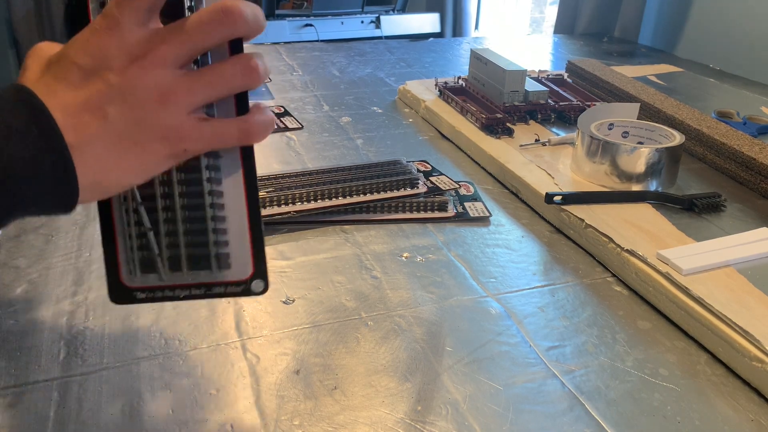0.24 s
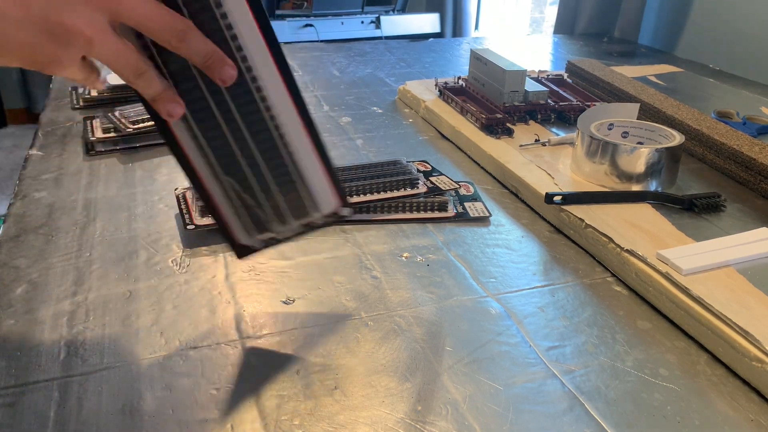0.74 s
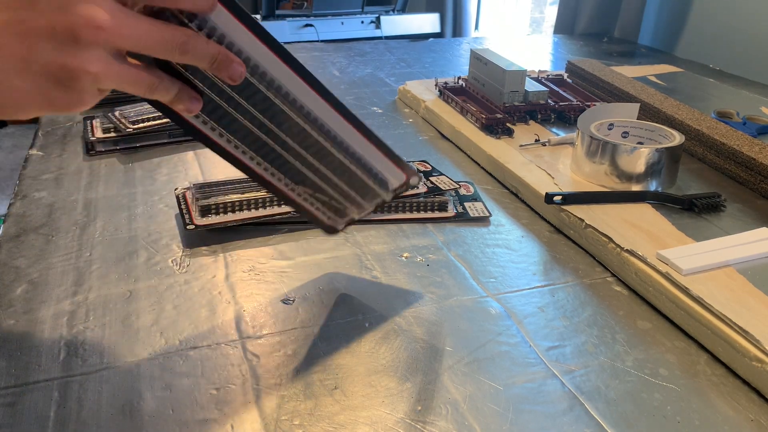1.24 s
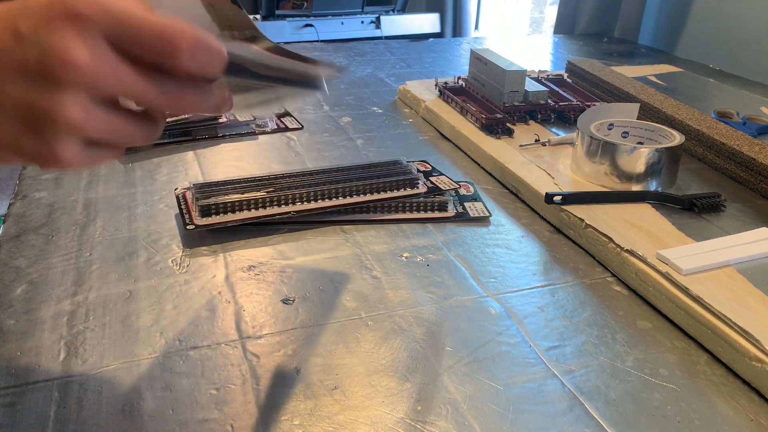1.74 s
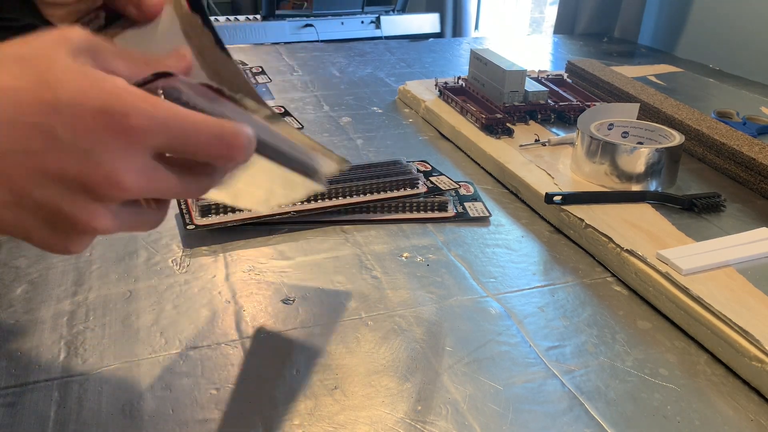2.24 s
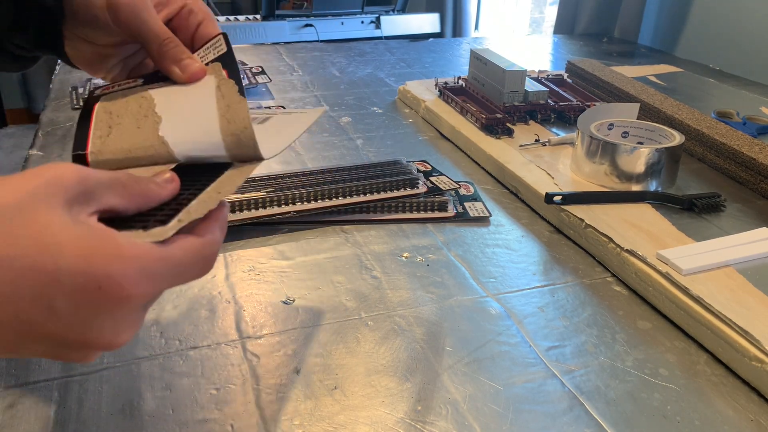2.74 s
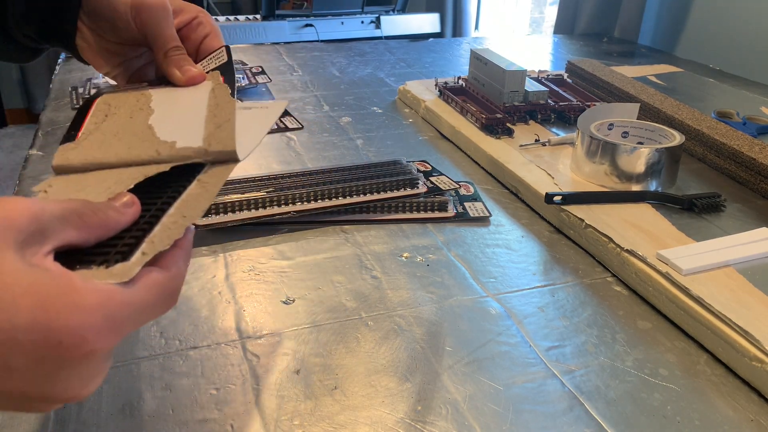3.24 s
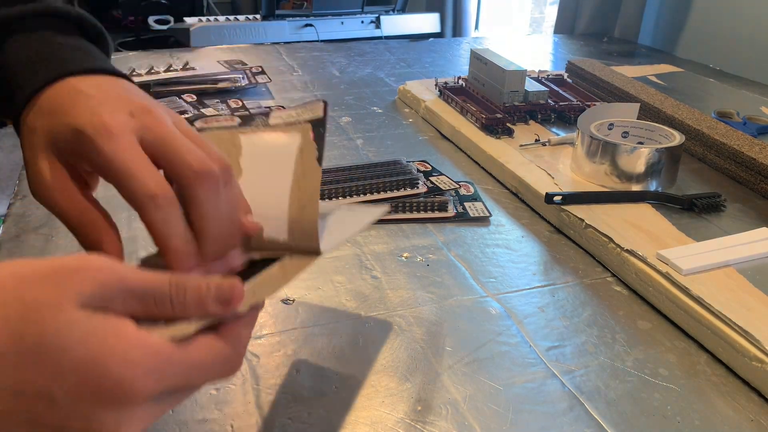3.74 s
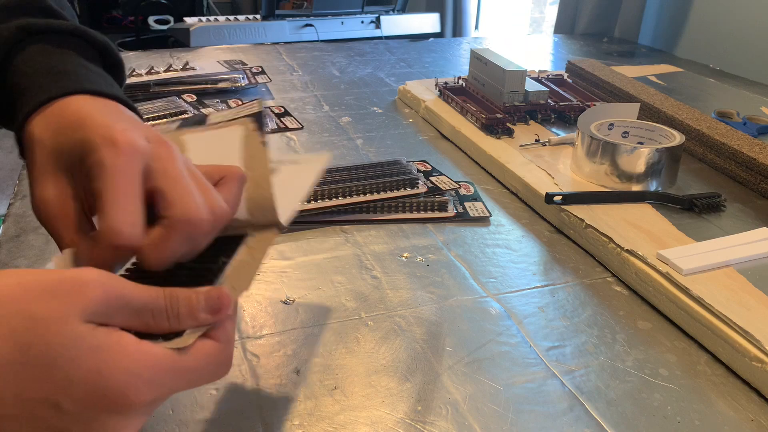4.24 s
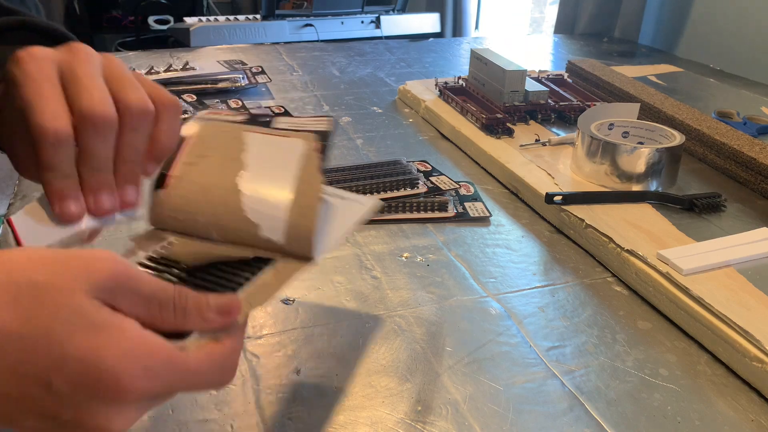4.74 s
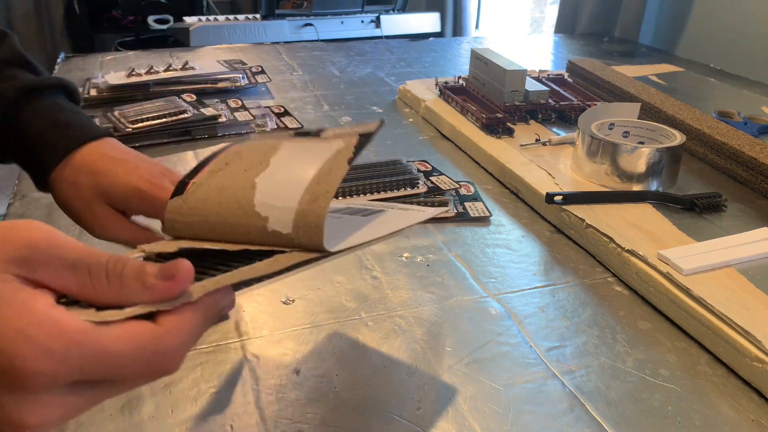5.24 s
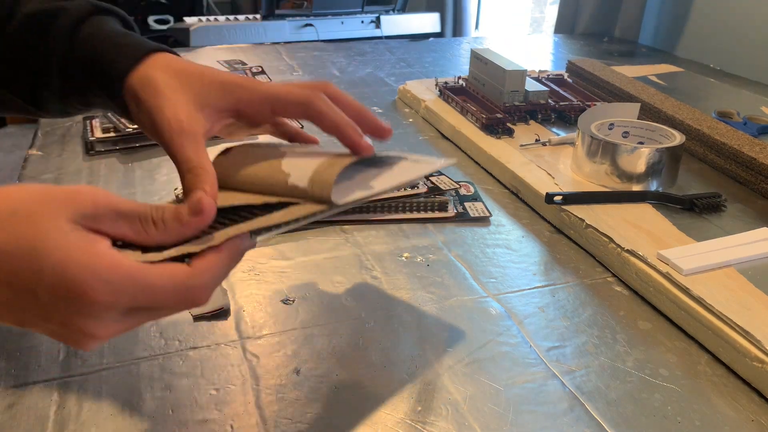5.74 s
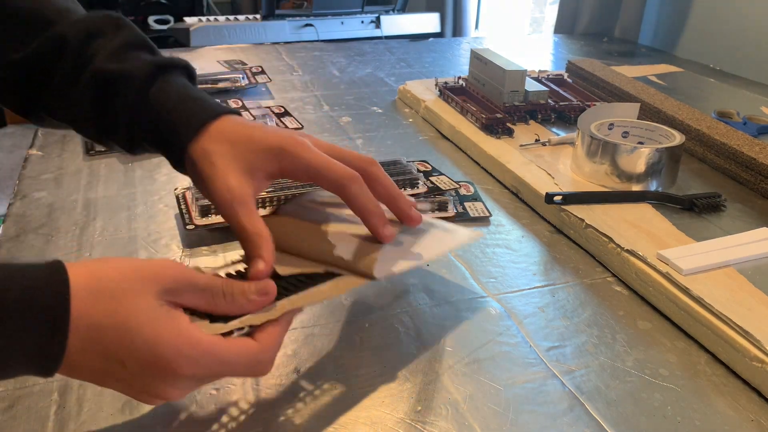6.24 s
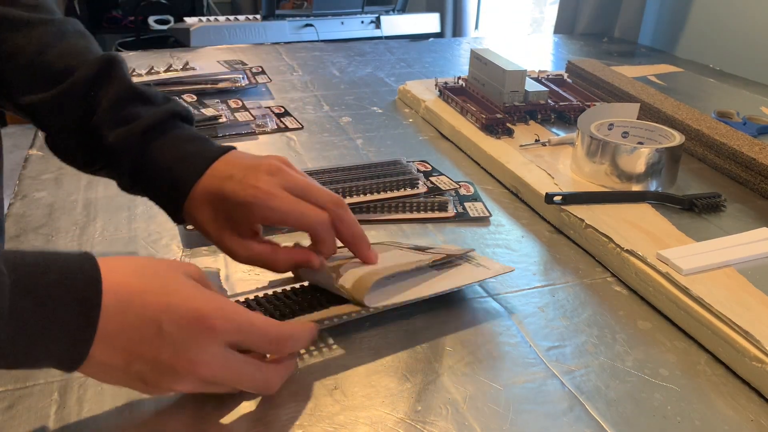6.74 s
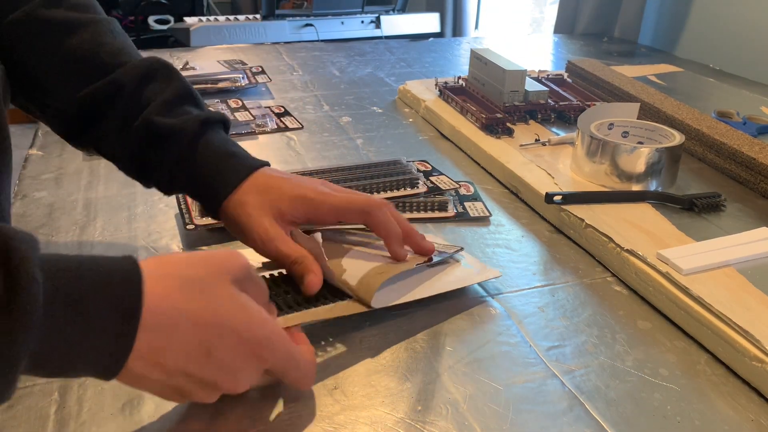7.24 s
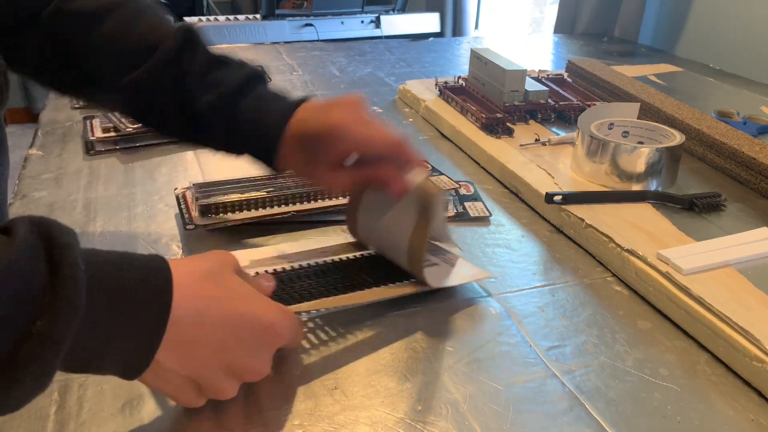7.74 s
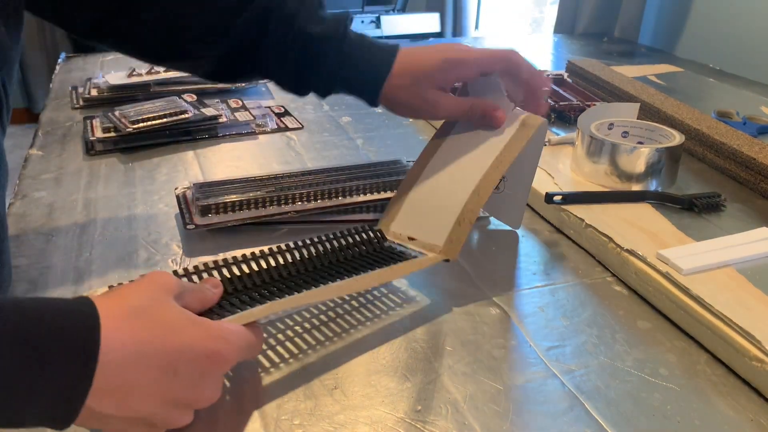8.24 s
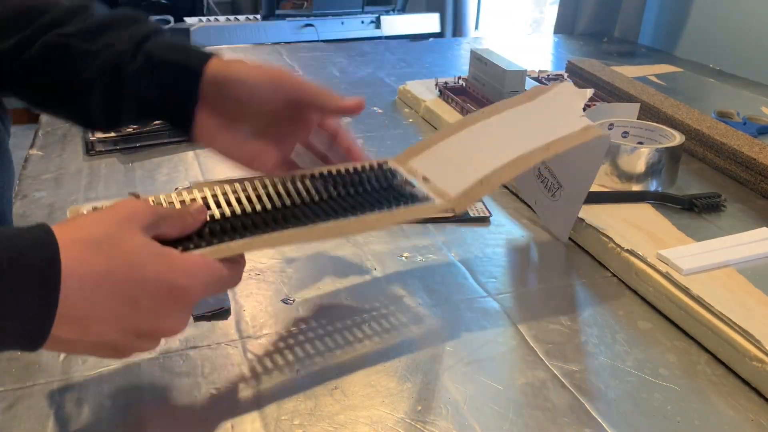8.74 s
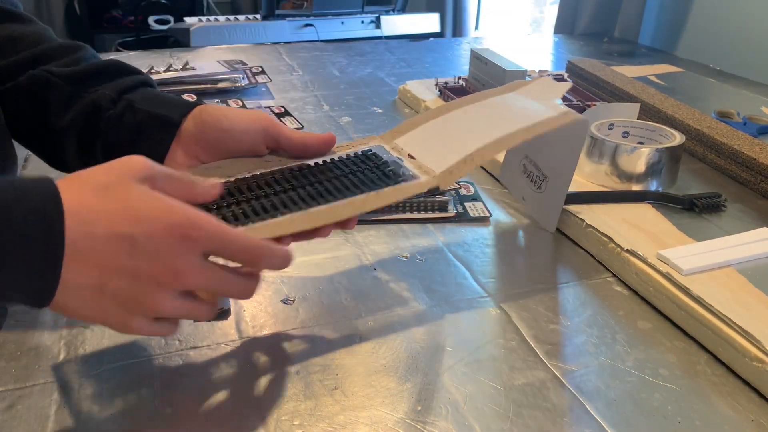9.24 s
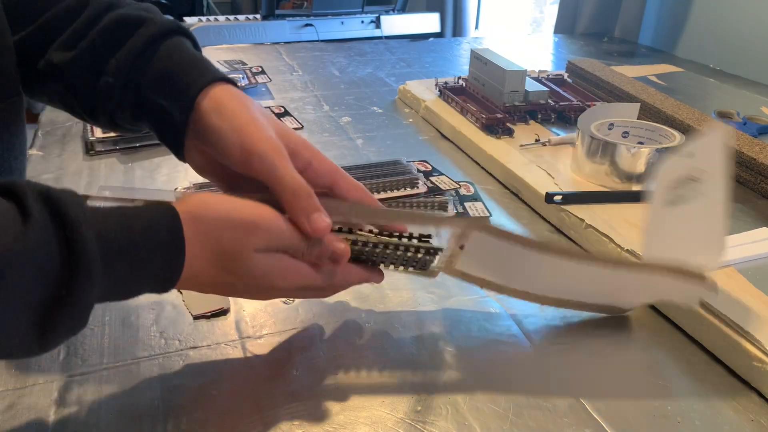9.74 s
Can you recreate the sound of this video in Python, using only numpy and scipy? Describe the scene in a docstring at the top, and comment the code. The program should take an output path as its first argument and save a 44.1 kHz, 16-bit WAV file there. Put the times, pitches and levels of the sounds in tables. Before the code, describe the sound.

Fingers handle a card-backed plastic blister pack close up, with shell clacks, crinkles, crackling cardboard tears and soft bench bumps in a small workshop.

```python
"""Fingers rub a card-backed plastic blister pack over a workbench, left of centre and close to a camera.
Shell snaps and knocks soon follow: runs of tiny slips with a pitched ring. The glued backing peels off
in tears, dense crackle made of random impulses; scuffs are swelling grains, bench bumps low modes.
Late on, the freed flap hums on two decaying tones and the bared tray rings. A small workshop answers
with a short, dense echo of decaying noise, over faint room air."""
import sys
import numpy as np
from scipy import signal
from scipy.fft import rfft, irfft, next_fast_len
from scipy.io import wavfile
from scipy.ndimage import map_coordinates

SR = 44100
rng = np.random.default_rng(int(sys.argv[2]) if len(sys.argv) > 2 else 0)


def wrap_up_sound(samples):
    """Save the sound to the file named by the first command line argument, as 16-bit audio."""
    columns = np.atleast_2d(samples).T
    # keep every value between -1 and 1, then stretch to whole-number steps
    tamed = np.clip(columns, -1, 1)
    steps = np.round(tamed * 32767).astype(np.int16)
    wavfile.write(sys.argv[1], SR, steps)


N = 440548

# Levels in the tables are relative: the sources and the mix add their own gains.
# a hand takes hold, slides and lets go; a strong fizz is a brief tear:
# full_grip_s, held_s, rubbing_db, fizz_db (re rubbing), flexing_db (re rubbing)
HAND_GRIPS = [(0.0, 0.11, -60.5, -28, -11.5), (0.168, 0.18, -53.5, -15, -14), (0.319, 0.1, -44.5, -15, -8),
              (0.47, 0.023, -44, -19, -7), (0.577, 0.036, -48.5, -20, -10), (0.783, 0.12, -62, -20, -23),
              (0.93, .23, -63, -19, -2), (1.18, .34, -53, -35, -6.5), (1.6, 0.19, -53, -20, -7.5),
              (1.923, 0.043, -44, -28, -12.5), (2.094, 0.036, -37.5, -8, -18), (2.19, .09, -49, -16, -6),
              (2.33, 0.097, -59.5, -26, -17), (2.44, 0.14, -61, 9.5, -16), (2.63, 0.067, -58, -10, -5),
              (2.83, 0.16, -56.5, -14, -35), (2.99, .2, -84, -18, -24), (3.23, 0.11, -52, -26, -35),
              (3.459, 0.14, -47.5, -25, -11), (3.688, 0.05, -46, -14, -7.5), (3.79, 0.053, -68.5, -34, -12),
              (3.923, 0.031, -49.5, -25, -7), (4.02, 0.084, -55, -1, -33), (4.1, 0.098, -53.5, -3, -29.5),
              (4.253, 0.073, -40.5, -9, -17), (4.368, 0.005, -57, 2, 5), (4.465, 0.027, -61, -33, -3),
              (4.519, 0.33, -49.5, -23, -15.5), (5.627, 0.085, -56.5, -12, -0.5),
              (5.735, 0.097, -54.5, -33, -12), (5.815, 0.11, -57, -16, -36), (5.98, 0.13, -60, -13, -31),
              (6.22, 0.062, -56.5, -17, -21.5), (6.352, 0.015, -37.5, -7, -14.5),
              (6.43, 0.15, -60, -31, -4.5), (6.58, 0.21, -53.5, -19, -12.5), (6.82, 0.18, -61.5, -24, -11),
              (7.038, 0.058, -59, -3.5, -18), (7.123, 0.047, -45.5, -16, -14),
              (7.23, .35, -54.5, -10.5, -7), (7.652, 0.21, -40.5, 2.5, -38), (7.934, 0.011, -35, -2.5, -29),
              (8.001, 0.17, -48, -23, -11), (8.22, 0.052, -54, -9, -6.5), (8.31, 0.09, -68, -11.5, -0.5),
              (8.87, 0.12, -50.5, -2.5, -30), (9.225, 0.077, -55, -16, -17), (9.39, 0.14, -55, -26, -15),
              (9.6, 0.053, -47, -1.5, -3), (9.656, 0.081, -43, -2.5, -4.5), (9.79, .07, -50.5, -7.5, -3),
              (9.928, 0.071, -49, -14, -15)]
# the shell buckles or is tapped: start_s, level_db, knock_db (re level), crack_db (re level), ring_hz
SHELL_SNAPS = [(0.033, -37.5, -32, -22, 1870), (0.306, -25.5, -11.5, -25, 1410),
               (0.324, -27, -20, -31, 1080), (0.378, -26.5, -9.5, -15, 1080),
               (0.447, -20, -16.5, -13, 1055), (0.579, -29, -25, -13, 1330),
               (0.777, -42.5, -8.5, -44, 1490), (0.906, -35, -22, -13, 1530),
               (1.089, -37.5, -40.5, -45, 1900), (1.199, -37, -3, -28, 1480),
               (1.279, -34, -20, -12.5, 1255), (1.628, -23, -44, -36, 1580), (1.919, -27, -10, -13, 1170),
               (2.072, -30, -31, -3.5, 1020), (2.097, -18.5, -32, -16, 1100),
               (2.206, -19, -16, -18.5, 1480), (2.246, -24.5, -16, -17, 1450),
               (2.328, -27.5, -21, -24, 1484), (2.5, -9.5, -22.5, -13.5, 1170),
               (2.933, -28, -45, -11, 2560), (2.998, -36.5, -46, -19, 1670), (3.25, -26, -48, -19, 1630),
               (3.403, -36.5, -43, -14, 1230), (3.458, -19.5, -10.5, -21, 1280),
               (3.509, -23, -14.5, -13.5, 1910), (3.962, -39.5, -18.5, -8, 1780),
               (4.094, -16.5, -24, -7, 1720), (4.257, -32, -16, -23, 1460), (4.291, -28, -11.5, -33, 1020),
               (4.515, -23, -34, -14.5, 1300), (4.714, -25.5, -41, -8, 1340),
               (4.754, -30.5, -11.5, -6.5, 1010), (4.823, -41.5, -24, -36, 1010),
               (4.997, -44.5, -28, -15, 710), (5.565, -55.5, -20, -26, 1100),
               (5.728, -31, -12.5, -15, 1760), (5.943, -30, -43, -5.5, 810), (6.036, -39, -44, -8, 1440),
               (6.332, -6, -27.5, -12.5, 1880), (6.341, -16, -15, -25, 1870), (6.35, -29, -9, -11, 1870),
               (6.571, -23.5, -25, -25.5, 1570), (6.696, -40, -10, -1.5, 1410),
               (7.12, -24, -18, -11.5, 1910), (7.182, -29, -21, -11.5, 900), (7.518, -32, -11, -15.5, 1800),
               (7.586, -27.5, -35, -11, 700), (7.921, -13, -38, -15.5, 1530), (7.929, -9, -38, -13.5, 1176),
               (7.937, -4.5, -33.5, -11, 1270), (8.051, -28.5, -13.5, -19, 1580),
               (8.095, -19.5, -30, -31.5, 1056), (8.786, -59.5, -18.5, -17, 2485),
               (8.949, -30.5, -23, -6, 1350), (9.247, -26.5, -41, -10, 1280), (9.384, -40, -10, -28, 815),
               (9.577, -25.5, -3, -52, 617), (9.617, -20.5, -19, -26.5, 1110), (9.647, -28, -9, -0.5, 1040),
               (9.767, -31.5, -9, -47, 870), (9.846, -38, 3.5, -61, 785)]
# fingers and card scuff past each other: start_s, level_db, fizz_db (re level)
CARD_SCUFFS = [(0.292, -24.5, -16), (0.489, -32.5, -21), (1.954, -29.5, -27), (2.183, -28.5, -28),
               (2.638, -39.5, -8), (3.444, -26.5, -14), (3.57, -28, -18), (3.691, -28, -13),
               (4.218, -29.5, -17), (4.612, -33.5, -10.5), (4.683, -24, -17), (5.615, -27.5, -11),
               (5.749, -33, -26), (6.215, -38, -19), (6.73, -33, -4), (7.812, -24.5, -5),
               (8.198, -32.5, -11.5), (8.86, -34, -10), (8.938, -26, -31), (9.118, -47.5, -34),
               (9.237, -30.5, -20), (9.422, -40.5, -45)]
# dull bumps of hand and pack on the bench: start_s, level_db
BENCH_BUMPS = [(0.309, -45), (4.789, -57), (6.335, -22), (6.426, -38.5), (6.758, -45.5), (7.113, -37),
               (7.23, -42), (7.335, -40.5), (7.459, -40), (7.836, -32.5), (7.928, -36.5), (8.089, -44),
               (9.576, -32), (9.69, -33.5)]
# the longer tears of the backing, one curve each; brief ones are fizzing grips: time_s, tearing_db
PEEL_CURVES = [
    [(1.27, -85), (1.288, -53), (1.37, -63), (1.448, -44), (1.538, -49.5), (1.728, -39.5), (1.97, -50.5),
     (2.04, -112)],
    [(2.58, -60), (2.662, -50.5), (2.76, -61.5), (2.822, -44.5), (2.886, -42), (2.962, -56.5),
     (3.202, -48.5), (3.38, -78)],
    [(4.55, -53), (4.584, -83), (4.622, -52), (4.758, -42.5), (4.772, -88), (4.816, -84), (4.824, -70),
     (4.85, -97)],
    [(6.58, -71), (6.604, -71), (6.61, -51.5), (6.734, -51), (6.748, -54), (6.788, -58), (6.92, -62.5),
     (6.95, -87)],
    [(7.5, -76), (7.596, -40.5), (7.632, -48), (7.714, -40), (7.802, -38.5), (7.832, -30), (7.886, -71),
     (7.9, -50)],
]
# the pack is pressed and dragged on the bench: time_s, level_db
DRAG_CURVE = [(7.06, -63), (7.088, -71), (7.118, -49.5), (7.678, -50.5), (7.83, -43), (8.39, -59)]
# resonances of the pack and its contents: centre_hz, width_hz, level_db
PACK_MODES = [(1210, 27, -7), (1427, 34, 5), (1776, 65, 7), (1902, 36, 9), (2407, 74, 6.5), (3020, 17, 2.5),
              (3310, 16, -6), (4000, 34, -3)]
# low modes of the pack on the bench: pitch_hz, level_db, t60_s
BENCH_MODES = [(52.1, -13.5, 0.2), (84, -2.5, 0.07), (132, -2, 0.22), (192, -6.5, 0.18), (346.3, -5, 0.078)]
# the freed cardboard flap: pitch_hz, level_db, t60_s
FLAP_MODES = [(133, -34, 0.31), (269.6, -39.5, 0.14)]
# the bared tray and its contents ring freely: centre_hz, width_hz, level_db
TRAY_MODES = [(726, 6.4, 20.5), (1200, 5.7, 12.5), (1307, 38, 13.5), (2050, 18, 6), (2500, 15, 12)]
# how freely the open tray can ring: time_s, freedom (0 to 1)
TRAY_FREEDOM = [(8.7, 0), (8.86, .5), (8.97, .55), (9.05, .3), (9.5, .15)]

# Colours of each noise: frequency_hz, level_db (per Hz)
# fingers and grain of the card
RUB_COLOUR = [(80, -35), (250, -22), (550, -5.5), (1200, -1), (1800, -2.5), (3200, -5), (5000, -10.5),
              (7500, -19), (15000, -29)]
# glued fibres parting
TEAR_COLOUR = [(400, -34.5), (1200, 2), (3000, -5.5), (6000, -8), (8200, 1), (11000, 3), (15500, -0.5)]
# dry tick of a thicker fibre or a spot of glue
TICK_COLOUR = [(400, -24.5), (1500, 4.5), (4200, 2), (7000, -10), (15000, -4)]
# hollow body of the pack
KNOCK_COLOUR = [(25, -22), (70, -13), (135, -10), (200, -2), (300, -6.5), (500, -7.5), (1500, -39.5)]
# clack of the thin shell
SHELL_COLOUR = [(100, -35.5), (350, -21), (700, 1), (1200, 4.5), (2000, 1.5), (3300, -1.5), (5000, -7.5),
                (8000, -29.5), (15000, -37)]
# bright edge of a snap
CRACK_COLOUR = [(1000, -36), (3500, 3.5), (6000, -4), (8500, 3.5), (12000, 1), (15500, -2)]
# pack dragged on the bench
THUD_COLOUR = [(20, -28), (50, -1), (95, 0), (135, 6), (165, -1), (195, 0.5), (300, -11), (500, -23.5),
               (1500, -53.5)]
# faint air of the room
AIR_COLOUR = [(20, -13.5), (55, -0.5), (150, -8), (400, -17), (1000, -22), (3000, -29), (8000, -31),
              (15000, -29.5)]

# decay of the workshop echo: frequency_hz, t60_s
ECHO_DECAY = [(100, 0.043), (260, 0.18), (700, 0.15), (1840, 0.11), (4850, 0.15), (12800, 0.083)]
# how alike the echo is at left and right: frequency_hz, likeness (0 to 1)
ECHO_LIKENESS = [(100, 0.86), (400, 0.07), (1000, 0.25), (2500, 0), (6000, 0)]
# the pack's place, nearer the centre as the lead shrinks: time_s, left_lead_ms
LEFT_LEAD = [(0, .18), (4.6, 0.2), (6.3, 0.077), (10, 0.12)]

GRIP_ATTACK_S, GRIP_RELEASE_DB_PER_S = 0.043, 400.5  # how fast a hand presses on and lets go
PEEL_DB, PEEL_RUB_DB = 0, -11.5  # gains of the parting fibres and of the card rasping along with them
DRAG_DB, HOLLOW_DB = -4, -6.5  # gains of the dragging and of the hollow rumble of a flexed pack
SNAP_T60_S = 0.038  # 60 dB fall of one buckle's clack
SCUFF_SWELL_S = 0.013  # time to the top of a scuff
TOP_HZ = 15900  # upper band limit of the camera


def amp(db):
    """Decibels to gain."""
    return 10 ** (np.asarray(db) / 20)


def unit(x):
    """Scale to rms 1."""
    return x / np.sqrt(np.mean(x ** 2) + 1e-20)


def along(points, hz):
    """Read (frequency, value) points on a log frequency axis."""
    f, v = np.transpose(points)
    return np.interp(np.log(hz + 1), np.log(f + 1), v)


def curves(rows):
    """One value per sample for each column after the time."""
    s, *cols = np.transpose(rows)
    return [np.interp(np.arange(N) / SR, s, c) for c in cols]


def wobble(rate):
    """A smooth random curve, rate knots a second."""
    knots = rng.standard_normal(int(N * rate / SR) + 4)
    return map_coordinates(knots, [np.arange(N) * rate / SR], order=2)


def filtered(x, response):
    """x passed through a complex response of frequency."""
    n = x.shape[-1]
    m = next_fast_len(n + SR // 8, True)
    return irfft(rfft(x, m) * response(np.fft.rfftfreq(m, 1 / SR)), m)[..., :n]


def coloured(x, spectrum):
    """x with its spectrum shaped by the given colour, at rms 1."""
    return unit(filtered(x, lambda hz: amp(along(spectrum, hz))))


def resonance(hz, centre, width):
    """Causal response of one mode, 1 at its centre."""
    return 1j * hz * width / (centre ** 2 - hz ** 2 + 1j * hz * width)


def mode_bank(hz, modes):
    """Summed response of (centre_hz, width_hz, level_db) modes."""
    return sum(amp(db) * resonance(hz, centre, width) for centre, width, db in modes)


def slips(n, rate, scatter_db):
    """Tiny random impulses of uneven size, rate a second: friction that sticks and lets go."""
    hits = rng.random(n) < rate / SR
    signs = rng.choice([-1, 1], n)
    return hits * signs * amp(scatter_db * np.clip(rng.standard_normal(n), -2, 2))


def pack(x, ring_db):
    """Whatever shakes the pack also rings its modes."""
    return filtered(x, lambda hz: 1 + amp(ring_db) * mode_bank(hz, PACK_MODES))


def stroke(rows):
    """Gain along a (time_s, level_db) curve, fading quickly outside it."""
    t = np.arange(N) / SR
    outside = np.abs(t - np.clip(t, rows[0][0], rows[-1][0]))
    return amp(curves(rows)[0] - GRIP_RELEASE_DB_PER_S * np.minimum(outside, 1))


def room_air():
    """Faint coloured noise, partly common to left and right."""
    return coloured(rng.standard_normal((2, N)) + rng.standard_normal(N), AIR_COLOUR)


def gripping():
    """Gains of rubbing, fizz and flexing: each grip builds up, holds and dies away."""
    t = np.arange(SR) / SR
    out = np.zeros((3, N + 2 * SR))  # a second spare at each end
    for s, held, rub_db, fizz_db, flex_db in HAND_GRIPS:
        attack = np.minimum(t / GRIP_ATTACK_S, 1) ** 2
        release = amp(-GRIP_RELEASE_DB_PER_S * np.maximum(t - GRIP_ATTACK_S - held, 0))
        start = SR + round((s - GRIP_ATTACK_S) * SR)
        gains = amp(rub_db) * amp([[0], [fizz_db], [flex_db]])
        out[:, start:start + SR] += gains * attack * release
    return out[:, SR:SR + N]


def crinkles(rate, centre_hz, scatter_db):
    """Stray creases, each a brief decaying ping of its own pitch and size, rate a second."""
    draws = rng.standard_normal((int(rate * N / SR), 2))
    starts = rng.integers(0, N, len(draws))
    k = np.arange(SR // 70)
    pitch_hz = centre_hz * np.exp(0.41 * draws[:, 0])
    cycles = np.outer(pitch_hz, k / SR)
    sizes = amp(scatter_db * np.clip(draws[:, 1:], -2, 2))
    pings = sizes * np.sin(2 * np.pi * cycles) * np.exp(-cycles / 2)
    places = (starts[:, None] + k).ravel()
    return unit(np.bincount(places, pings.ravel(), N + len(k))[:N])


def card_rubbing(gain):
    """Skin and card stick and slip while small creases ping, and the pack's modes ring along."""
    rub = coloured(slips(N, rate=2500, scatter_db=5), RUB_COLOUR)
    rub = unit(rub * amp(3 * wobble(90)))
    creases = crinkles(rate=280, centre_hz=1750, scatter_db=6.5)
    return pack(gain * (amp(-3) * rub + amp(-2) * creases), ring_db=-12)


def flexing(gain):
    """A flexed pack gives low creaking pings over a hollow noise rumble."""
    creaks = crinkles(rate=90, centre_hz=330, scatter_db=4)
    hollow = coloured(rng.standard_normal(N), KNOCK_COLOUR)
    return gain * (amp(1) * creaks + amp(HOLLOW_DB) * hollow)


def fizz_and_tearing(gain):
    """Fibres part in clumps: dense slips of wandering strength, fizz in a grip and crackle in a tear."""
    tear = coloured(slips(N, rate=1100, scatter_db=6), TEAR_COLOUR)
    tear = unit(tear * amp(3 * wobble(130) + 1.5 * wobble(25)))
    # now and then a thicker fibre or a spot of glue lets go
    ticks = coloured(slips(N, rate=70, scatter_db=5), TICK_COLOUR)
    return amp(3.5) * gain * (tear + amp(-8) * ticks)


def dragging():
    """The pack pressed along the bench gives a low thudding noise."""
    return amp(DRAG_DB) * stroke(DRAG_CURVE) * coloured(rng.standard_normal(N), THUD_COLOUR)


def handling():
    """Hands rub, flex, tear and drag the pack; a tear rubs the card too, and a grip also fizzes."""
    rubbing, fizz, flex = gripping()
    pull = sum(stroke(rows) for rows in PEEL_CURVES)
    card = card_rubbing(np.hypot(rubbing, amp(PEEL_RUB_DB) * pull))
    fibres = fizz_and_tearing(np.hypot(fizz, amp(PEEL_DB) * pull))
    return card + flexing(flex) + fibres + dragging()


def workshop(x):
    """Bench and walls answer with decaying noise, redrawn 18 times a second so that it stays noise-like."""
    hop, size = SR // 18, SR // 4
    out = np.zeros((2, N + 4 * hop + size))
    padded = np.pad(x, (hop, 2 * hop))
    window = np.sqrt(np.hanning(2 * hop))
    for i in range(0, N + hop, hop):
        hz, t, z = signal.stft(rng.standard_normal((2, size)), SR, nperseg=256)
        # the balance of mid and side sets how alike left and right are
        turn = np.arccos(np.clip(along(ECHO_LIKENESS, hz), -1, 1)) / 2
        z = z * np.array([np.cos(turn), np.sin(turn)])[:, :, None]
        near_bench = 1 + 0.37 * np.exp(-t / 0.049)  # close surfaces strengthen the early echo
        decay = near_bench * amp(-60 * t / along(ECHO_DECAY, hz)[:, None])
        mid, side = signal.istft(z * decay, SR, nperseg=256)[1]
        tail = np.array([mid + side, mid - side])
        tail = tail / np.linalg.norm(tail[0])
        piece = padded[i:i + 2 * hop] * window
        echo = signal.fftconvolve(piece[None], tail, axes=1)
        out[:, i:i + echo.shape[1]] += echo
    return out[:, hop:hop + N]


def snaps():
    """Each buckle is a quick run of slips: a low knock, the shell's pitched clack and a bright crack."""
    size = SR // 5
    t = np.arange(size) / SR
    out = np.zeros(N + size)
    for s, db, knock_db, crack_db, ring_hz in SHELL_SNAPS:
        fade = amp(-60 * t / SNAP_T60_S)
        rise = 1 - np.exp(-t / 0.0014)  # the fold takes a moment to run through the shell
        knock = coloured(rng.standard_normal(size), KNOCK_COLOUR) * amp(-60 * t / 0.11)
        clack = coloured(slips(size, rate=9000, scatter_db=-0.5), SHELL_COLOUR) * fade
        crack = coloured(slips(size, rate=7000, scatter_db=-1), CRACK_COLOUR) * fade ** 3.17
        ring = np.sin(2 * np.pi * ring_hz * t) * amp(-60 * t / 0.016)
        ring_db = -9.5 - 0.31 * crack_db  # dull taps are mostly ring, bright ones mostly crack
        burst = amp(knock_db - 1.5) * knock + amp(-7.5) * clack + amp(crack_db + 14.5) * crack
        start = round(s * SR)
        out[start:][:size] += amp(db) * (rise * burst + amp(ring_db) * ring)
        # small slips gather for up to 25 ms before the shell gives way: a fade played backwards
        lead = min(start, SR // 40)
        strain = coloured(slips(size, rate=3200, scatter_db=4.5), SHELL_COLOUR) * amp(-60 * t / 0.054)
        out[start - lead:start] += amp(db - 27.5) * strain[:lead][::-1]
    return pack(out[:N], ring_db=-6)


def scuffs():
    """A short slide swells and fades: grainy friction in the card with fizz on top."""
    size = SR // 4
    t = np.arange(size) / SR
    out = np.zeros(N + size)
    for s, db, fizz_db in CARD_SCUFFS:
        u = t / SCUFF_SWELL_S
        swell = (u * np.exp(1 - u)) ** 2
        grain = coloured(slips(size, rate=1700, scatter_db=2.5), RUB_COLOUR)
        fizz = coloured(slips(size, rate=490, scatter_db=9.5), TEAR_COLOUR)
        out[round(s * SR):][:size] += amp(db) * swell * (amp(-11.5) * grain + amp(fizz_db) * fizz)
    return pack(out[:N], ring_db=-13)


def bumps():
    """Soft contacts ring only the low modes, at new strengths and slightly new pitches each time."""
    t = np.arange(SR // 3) / SR
    out = np.zeros(N + len(t))
    for s, db in BENCH_BUMPS:
        ring = 0
        for hz, level, t60 in BENCH_MODES:
            fade = amp(level + rng.normal(0, 0.77) - 60 * t / t60)
            ring = ring + fade * np.sin(2 * np.pi * (hz * rng.normal(1, 0.018) * t + rng.random()))
        soft_onset = 1 - np.exp(-t / 0.0044)
        out[round(s * SR):][:len(t)] += amp(db - 1.5) * ring * soft_onset
    return out[:N]


def flap(start_s=8.405, swell_s=0.041):
    """The cardboard flap slides off the fingers and hums on two decaying tones."""
    t = np.maximum(np.arange(N) / SR - start_s, 0)
    rise = np.sin(np.pi / 2 * np.minimum(t / swell_s, 1)) ** 2
    hum = sum(amp(db - 60 * t / t60) * np.sin(2 * np.pi * hz * t) for hz, db, t60 in FLAP_MODES)
    return hum * rise


def tray(touches):
    """With the backing off, handling, scuffs and snaps set the tray's modes ringing."""
    freedom, = curves(TRAY_FREEDOM)
    return filtered(touches * freedom, lambda hz: mode_bank(hz, TRAY_MODES))


def scene():
    """The pack sits left of centre in echo and faint air; the bench carries the bass to the right."""
    air = room_air()
    touches = handling() + snaps() + scuffs()
    source = touches + tray(touches)
    lead_ms, = curves(LEFT_LEAD)
    right = map_coordinates(source, [np.arange(N) - lead_ms * SR / 1000])  # arrives later at the right
    direct = np.array([source, right])
    bass = (bumps() + flap()) * amp([[-2], [1.5]])
    return amp(-4.5) * direct + amp(-2.5) * workshop(source) + bass + amp(-74.5) * air


def record(dry):
    """The camera shares one treble signal between both channels, later on the left, and limits the band."""
    def treble_share(hz):
        return 1 / (1 + (6600 / (hz + 1)) ** 16)

    def left_lag(hz):
        # a delay of 1/4800 s, with its phase turned to match the right at 6200 Hz
        return np.exp(-2j * np.pi * (hz - 6200) / 4800)

    def low_band(hz):
        bass_cut = 1 / np.sqrt(1 + (36 / (hz + 1)) ** 8)
        return np.sqrt(1 - treble_share(hz)) * bass_cut

    def high_band(hz):
        return np.sqrt(treble_share(hz)) * np.array([left_lag(hz), np.ones_like(hz)])

    low = filtered(dry, low_band) * amp([[-0.4], [0.4]])
    high = filtered(dry[0], high_band)
    return filtered(low + high, lambda hz: 1 / (1 + (hz / TOP_HZ) ** 200))


dry = scene()
out = record(dry)
wrap_up_sound(out)
```